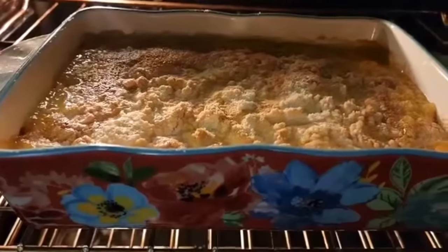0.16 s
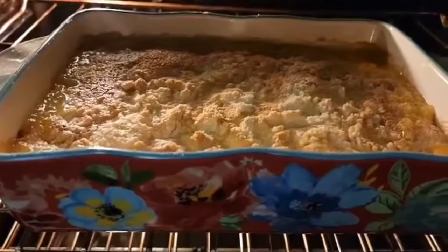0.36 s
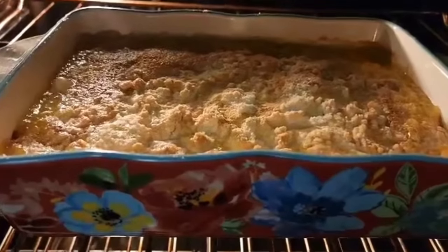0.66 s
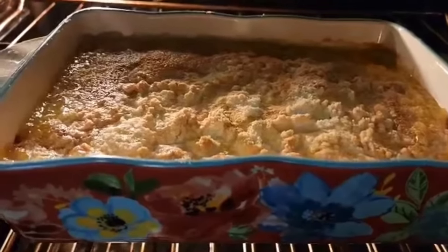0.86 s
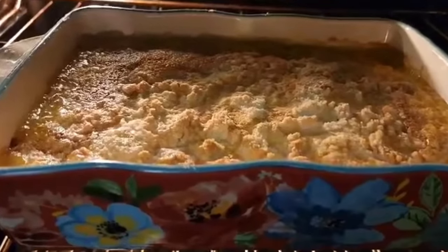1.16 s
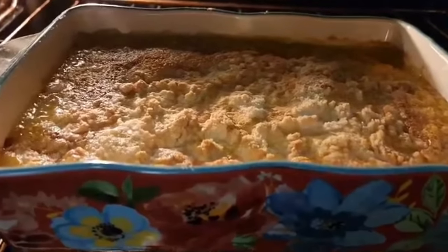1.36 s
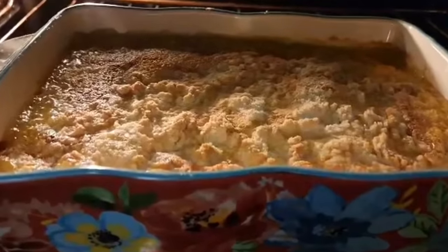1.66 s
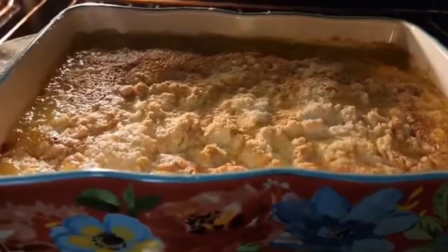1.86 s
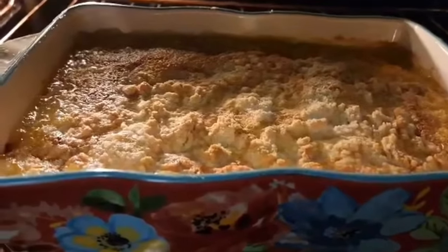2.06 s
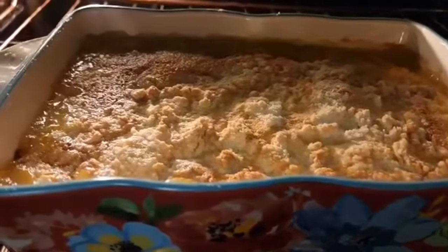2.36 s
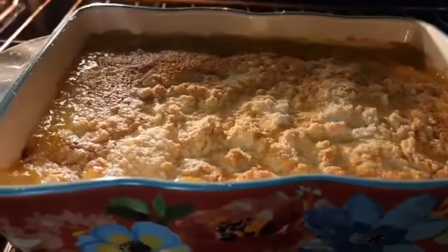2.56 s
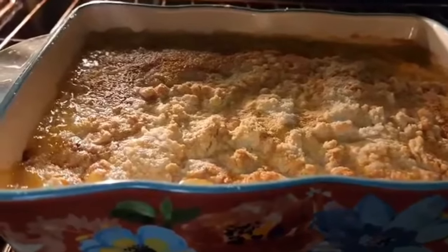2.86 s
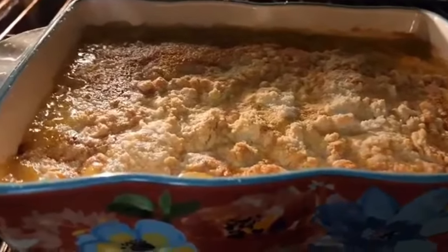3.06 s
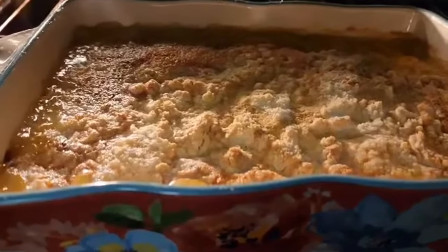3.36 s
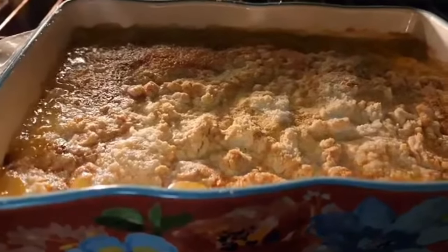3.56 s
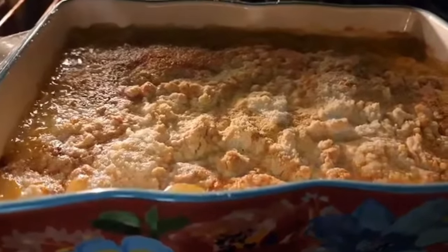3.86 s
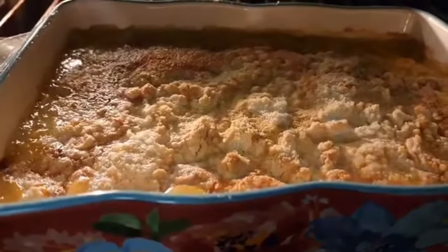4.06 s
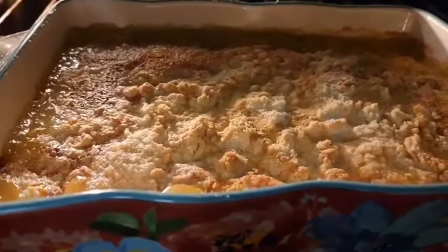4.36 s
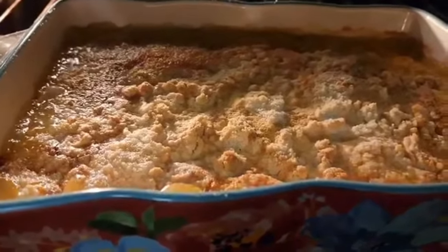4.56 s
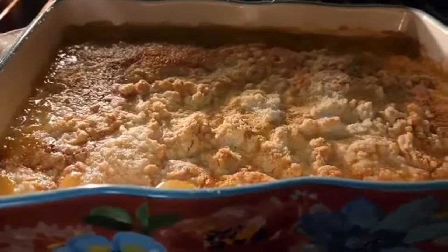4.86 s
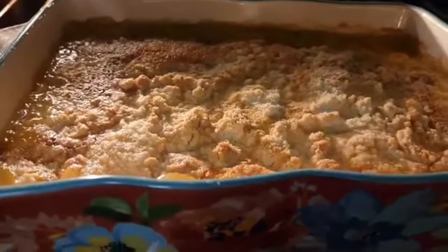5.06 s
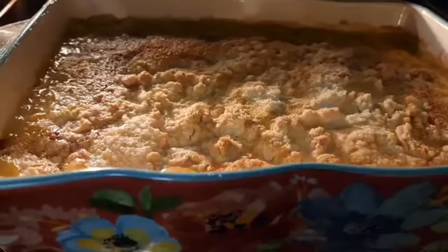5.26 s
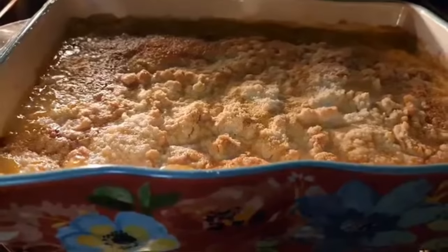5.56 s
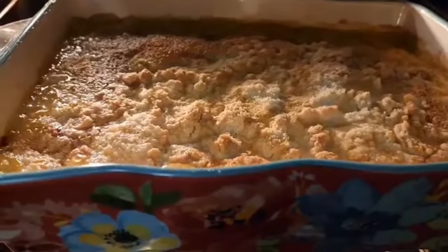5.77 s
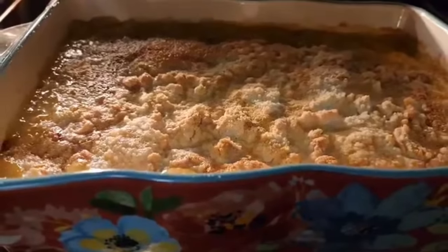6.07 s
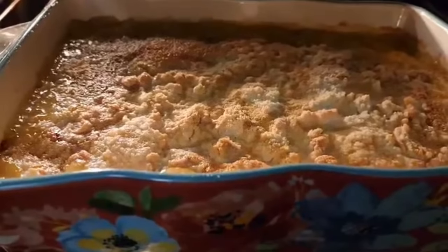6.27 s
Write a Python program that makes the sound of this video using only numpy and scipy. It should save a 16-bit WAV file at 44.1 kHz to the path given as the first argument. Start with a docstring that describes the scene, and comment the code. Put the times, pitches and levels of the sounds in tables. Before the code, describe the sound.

Close inside a hot oven, a steady low electrical hum and soft fluttering air lie beneath a baking fruit cobbler. Syrup fizzes continuously in a fine, uneven crackle, while small bubbles burst several times a second in short wet spits. Tiny pops, dull steam bumps and sharp crust ticks land irregularly, with a short metallic-walled echo. A very faint high whine sits on the right.

```python
"""An oven hums at twice the mains frequency over the soft noise of hot air, with a faint high whine on the right.
From the start, syrup on baking fruit fizzes: a shower of tiny random clicks. Bubbles soon burst in little sprays
of noise; steam bumps the crust, skins pop and the crust ticks in short rings; later, bubbles ring as they open.
The steel oven echoes the dish. All but the steady hum tone repeats about every three seconds, with its chance noise.
"""
import sys
import numpy as np
from scipy import signal
from scipy.fft import rfft, irfft
from scipy.io import wavfile

SR = 44100
rng = np.random.default_rng(int(sys.argv[2]) if len(sys.argv) > 2 else 0)


def unload_audio(sound):
    """Save the sound as a 16-bit wav file, at the path given as the first command line argument."""
    columns = np.transpose(np.atleast_2d(sound))
    # keep every value between -1 and 1, then stretch to whole-number steps
    steps = np.round(np.clip(columns, -1, 1) * 32767)
    wavfile.write(sys.argv[1], SR, steps.astype(np.int16))


N = 282394
CYCLE = 138318  # length of the repeating stretch [samples]
T = np.arange(CYCLE) / SR  # times in the cycle [s]
HZ = np.arange(CYCLE // 2 + 1) * SR / CYCLE  # frequencies in the cycle [Hz]
EAR_LAG_S = 0.0005  # how much later a pop reaches the right ear; ticks use half of it

# colour of the fine spray, in fizz and bursts: (frequency [Hz], relative level [dB])
SPRAY_COLOUR = [(7000, -12.5), (9000, 2.5), (10300, -19), (11600, 0.5), (13000, -14)]


def undb(db):
    """Turn decibels into gain."""
    return 10 ** (np.asarray(db) / 20)


def unit(x):
    """Scale to an average strength (rms) of 1."""
    return x / np.sqrt(np.mean(x ** 2))


def pan(db):
    """Left and right gains for a left-minus-right level in dB."""
    return undb(np.array([[db], [-db]]) / 2)


def curve(table):
    """Join (time, value) rows by straight lines."""
    return np.interp(T, *np.transpose(table))


def colour(points):
    """Gain at each frequency, from (Hz, dB) points joined on a log frequency scale."""
    hz, db = np.transpose(points)
    return undb(np.interp(np.log(np.maximum(HZ, 1)), np.log(hz), db))


def filtered(x, gain):
    """Weight the frequencies of a sound; its end wraps round to its start."""
    return irfft(rfft(x) * gain, CYCLE)


def walk(hz):
    """Smooth random wavering of spread 1, with up to about hz changes a second."""
    return unit(filtered(rng.standard_normal(CYCLE), np.exp(-(HZ / hz) ** 2)))


def crackle(rate, spread_db):
    """Tiny films break at random, about rate a second: many small, few large, with chance strengths in each ear."""
    happens = rng.random(CYCLE) < rate / SR
    size = undb(spread_db * np.minimum(rng.exponential(size=CYCLE), 4))
    return unit(happens * size * rng.standard_normal((2, CYCLE)))


def steel_box(x, t60, echo_db):
    """Add the dense echoes of the steel walls, as noise that fades by 60 dB in t60 seconds."""
    fade = np.exp(-np.log(1000) * T / t60)
    echoes = rng.standard_normal((2, CYCLE)) * fade * (T > 0.001)
    echoes /= np.sqrt(np.sum(echoes ** 2, axis=1, keepdims=True))
    return x + undb(echo_db) * filtered(x, rfft(echoes))


def shifting(x, count=48):
    """Let each narrow band swell and fade at random on its own, more deeply in the treble."""
    centres = np.linspace(0, 13000, count)
    depths_db = np.interp(centres, [2000, 3000], [2.8, 4.8])
    out = 0
    for weights, depth_db in zip(np.eye(count), depths_db):
        band = filtered(x, np.interp(HZ, centres, weights))
        out = out + band * undb(depth_db * walk(25))
    return out


def snap(hz, ring_s, lag_s):
    """A short damped ring that reaches the right ear lag_s later."""
    age = np.maximum(T[:256] - np.array([[0], [lag_s]]), 0)
    envelope = (age / ring_s * np.exp(1 - age / ring_s)) ** 2
    return envelope * np.sin(2 * np.pi * hz * age)


def add(out, s, sound):
    """Mix a short sound into the cycle at s seconds."""
    out[:, (int(s * SR) + np.arange(sound.shape[1])) % CYCLE] += sound


def hum(gain_db=1.83, octave_db=-28, hum_hz=119.92):
    """The oven body shakes at twice the mains frequency, with a faint octave; its level wavers slightly."""
    # level before gain_db: (time [s], level [dB])
    hum_levels = [(0, -43), (0.13, -41), (0.3, -43.5), (0.42, -43.5), (0.53, -42), (0.79, -41.5),
                  (0.9, -45), (1.0, -42), (1.28, -42), (1.66, -43), (1.87, -40.5), (2.08, -44),
                  (2.34, -40.5), (2.51, -44), (2.68, -41.5), (2.86, -43.5), (2.97, -42), (3.14, -42.5)]
    phase = 2 * np.pi * hum_hz * np.arange(N) / SR
    tone = np.sin(phase) + undb(octave_db) * np.sin(2 * phase)
    return np.sqrt(2) * tone * np.resize(undb(curve(hum_levels) + gain_db), N)


def air(flutter_db=1.68):
    """Churning hot air is noise shaped by the oven's resonances; the bass is nearly alike in both ears."""
    # noise before the resonances: (frequency [Hz], level [dB per Hz])
    air_colour = [(15, -84), (30, -75.5), (45, -73.5), (76, -70.5), (105, -72.5), (140, -74), (180, -85),
                  (290, -86.5), (350, -87), (450, -93), (725, -93), (790, -96), (1200, -107), (3000, -113),
                  (8000, -117), (13000, -130)]
    # the part that differs between the ears: (frequency [Hz], level against the shared part [dB])
    side_colour = [(25, -14), (60, -22), (140, -35), (220, -13), (450, -7), (650, -10), (850, -3),
                   (1200, 0)]
    # air resonances of the oven: (frequency [Hz], width [Hz], lift [dB])
    resonances = [(237, 93, 8.5), (301.4, 12.7, 8), (499.7, 41, 6.5), (540, 42, 3.5), (639, 78, 8),
                  (706, 31, 5.5)]
    lift_db = sum(db / (1 + (2 * (HZ - hz) / width) ** 2) for hz, width, db in resonances)
    noise = rng.standard_normal((2, CYCLE)) * np.sqrt(SR / 2)  # strength 1 per Hz
    mid, side = filtered(noise, colour(air_colour) * undb(lift_db))
    side = filtered(side, colour(side_colour))
    return (mid + side * np.array([[1], [-1]])) * undb(flutter_db * walk(18))


def whine(whine_hz=4738, whine_db=-85.5, pan_db=-7):
    """A thin sine tone, stronger on the right, wavers in pitch and level, half buried in the fizz."""
    phase = 2 * np.pi * np.cumsum(whine_hz + 7 * walk(15)) / SR
    waver_db = 3 * walk(10)
    return np.sqrt(2) * np.sin(phase) * undb(whine_db + waver_db) * pan(pan_db)


def fizz(gain_db=3.5, spray_pan_db=0, fine_db=-14, fine_slope=2):
    """Syrup simmers along the rim: many tiny films break in a dense crackle with a finer spray above it."""
    # how hard the syrup simmers, before gain_db: (time [s], level [dB])
    simmer_levels = [(0.0, -69.5), (0.13, -66), (0.3, -74), (0.51, -75), (0.6, -66.5), (0.79, -73),
                     (0.9, -68), (1.03, -69.5), (1.11, -74), (1.22, -70.5), (1.55, -67.5), (1.73, -70),
                     (1.85, -67.5), (2.04, -73), (2.12, -71), (2.5, -69.5), (2.68, -75), (2.85, -70),
                     (3.14, -68.5)]
    # colour of the coarse crackle: (frequency [Hz], relative level [dB])
    fizz_colour = [(500, -34), (1200, 4), (1800, 10.5), (2900, -0.5), (4500, -1), (6300, 4), (7600, 5),
                   (9000, -4.5), (10200, -53), (11600, -27), (13000, -15)]
    simmer_db = curve(simmer_levels) + gain_db
    # the spray is softer and swells more steeply (fine_slope dB per dB of simmer)
    mean_db = simmer_db.mean()
    spray_db = fine_db + mean_db + fine_slope * (simmer_db - mean_db)
    ruptures = steel_box(crackle(rate=650, spread_db=3.2), t60=0.06, echo_db=1)
    coarse = unit(filtered(ruptures, colour(fizz_colour))) * undb(simmer_db)
    fine = unit(filtered(crackle(rate=10000, spread_db=3.5), colour(SPRAY_COLOUR)))
    fine = fine * undb(spray_db) * pan(spray_pan_db)
    return shifting(coarse + fine)


def bursts(body_db=-1, spit_db=-1.5, spray_db=-18):
    """Bubbles tear open in quickly fading flurries of tiny breaks, each with its own strength and brightness."""
    # bursting bubbles: (time [s], level before the band mix [dB], brightness [dB])
    burst_list = [(0.045, -56.5, 6.5), (0.097, -53, -2), (0.21, -58, -1), (0.316, -55, -1.5),
                  (0.446, -68.5, -10), (0.55, -78, 1), (0.601, -60.5, 5), (0.679, -64, -5),
                  (0.714, -60.5, -1.5), (0.86, -73.5, -11.5), (0.951, -57, -3), (1.072, -67.5, 28.5),
                  (1.174, -56.5, -2), (1.36, -53, 3.5), (1.578, -58.5, -5), (1.667, -59, 6.5),
                  (1.774, -51, 2), (1.8113, -57, 14), (1.9914, -64, 30), (2.113, -57.5, -4),
                  (2.14, -70, -9), (2.242, -57.5, 8), (2.305, -69.5, -12), (2.177, -58.5, -2),
                  (2.45, -56.5, 4), (2.4746, -51.5, 6), (2.612, -71.5, 19), (2.72, -60.5, 19.5),
                  (2.7595, -68, -9.5), (2.922, -55, 4.5), (2.945, -58.5, -1), (3.057, -61, 12),
                  (3.107, -59, 6)]
    # low band of a burst: (frequency [Hz], relative level [dB])
    body_colour = [(400, -2), (800, 8), (1150, 1), (1850, 7), (3000, 3), (4200, -14.5), (7000, -53)]
    # middle band of a burst: (frequency [Hz], relative level [dB])
    spit_colour = [(1800, -48), (3600, 20), (5000, 19.5), (6400, 21), (7700, 16), (9000, -11), (10300, -28)]
    rise_s, typical_fade_s = 0.0012, 0.0084
    doubling_db = 60  # a bubble this much louder takes twice as long to empty
    spray_per_brightness = 0.82  # dB of spray per dB of brightness
    scatter_db = 0.5  # random left-right spread over the dish

    flurry = steel_box(crackle(rate=2500, spread_db=2.5), t60=0.012, echo_db=0)
    body = unit(filtered(flurry, colour(body_colour))) * undb(body_db)
    spit = unit(filtered(flurry, colour(spit_colour))) * undb(spit_db)
    spray = unit(filtered(flurry, colour(SPRAY_COLOUR))) * undb(spray_db)
    out = np.zeros((2, CYCLE))
    typical_db = np.mean([db for s, db, bright_db in burst_list])
    places = rng.standard_normal(len(burst_list))
    for (s, db, bright_db), place in zip(burst_list, places):
        start = int(s * SR)
        span = slice(start, start + SR // 5)
        age = T[span] - T[start]
        fade_s = typical_fade_s * 2 ** ((db - typical_db) / doubling_db)
        envelope = undb(db) * (1 - np.exp(-age / rise_s)) * np.exp(-age / fade_s)
        tear = undb(-bright_db) * body[:, span] + spit[:, span]
        tear += undb(spray_per_brightness * bright_db) * spray[:, span]
        out[:, span] += envelope * pan(scatter_db * place) * tear
    return steel_box(out, t60=0.19, echo_db=0.5)


def bump(rise_s=0.0046):
    """Large pockets of steam lift the crust, each with a dull bump of low noise, alike in both ears."""
    # steam pockets: (time [s], level [dB])
    bump_list = [(0.096, -50.5), (0.215, -56), (0.716, -54), (1.669, -45.5), (1.776, -58), (1.810, -55)]
    # colour of the bumps: (frequency [Hz], relative level [dB])
    bump_colour = [(180, -25), (300, 2), (370, 2), (470, -7), (640, -2), (850, -9), (1200, -30)]
    push = unit(filtered(rng.standard_normal(CYCLE), colour(bump_colour)))
    envelope = np.zeros(CYCLE)
    for s, db in bump_list:
        age = np.maximum(T - s, 0) / rise_s
        envelope += undb(db) * (age * np.exp(1 - age)) ** 2
    return push * envelope


def pops(gain_db=0, cycles=0.23, echo_db=2):
    """A taut bubble skin gives way in one quick swing of pressure, which rattles between the oven walls."""
    # popping skins, before echoes: (time [s], envelope peak [dB], pitch [Hz])
    pop_list = [(0.0966, -38, 2200), (0.1324, -50, 2000), (0.177, -47, 2400), (0.218, -42, 2200),
                (0.3207, -50, 2000), (0.7163, -42, 1700), (0.9572, -47, 3800), (1.1765, -46, 2000),
                (1.3635, -41, 4000), (1.5834, -42, 1900), (1.6697, -44, 1700), (1.7764, -39, 3400),
                (1.933, -48, 1900), (2.0765, -44, 1900), (2.475, -50, 3500), (2.613, -47, 1900)]
    out = np.zeros((2, CYCLE))
    for s, db, hz in pop_list:
        add(out, s, undb(db + gain_db) * snap(hz, cycles / hz, EAR_LAG_S))
    return steel_box(out, t60=0.06, echo_db=echo_db)


def ticks(gain_db=-5.0, ring_s=0.00026):
    """The crust snaps in sharp, very short rings; the walls leave a faint tail."""
    # crust ticks: (time [s], envelope peak before gain_db [dB], pitch [Hz], left minus right [dB])
    tick_list = [(0.1768, -36, 5940, -3), (0.609, -59.5, 7000, 18), (0.623, -51, 7200, 3),
                 (0.8644, -54.5, 7550, 2), (1.1662, -38, 5700, 1), (1.1762, -41.5, 7180, -2),
                 (1.1994, -43, 6100, -3), (1.248, -46.5, 6360, -14), (1.291, -51, 5040, -14),
                 (1.403, -39.5, 7340, -2), (1.6612, -39, 6700, 0), (1.812, -44, 5240, -20),
                 (2.122, -56, 4740, -5), (2.075, -32, 7100, -6), (2.0814, -32, 5800, -4),
                 (2.2317, -36.5, 6900, -6), (2.244, -38, 4900, -4), (2.9237, -45, 5000, -18),
                 (2.9289, -38, 7260, 7), (3.109, -51.5, 4500, -1)]
    out = np.zeros((2, CYCLE))
    for s, db, hz, pan_db in tick_list:
        add(out, s, undb(db) * pan(pan_db) * snap(hz, ring_s, EAR_LAG_S / 2))
    return undb(gain_db) * steel_box(out, t60=0.06, echo_db=-3)


def bubbles(fade_s=0.0078, rise_s=0.00036, width=0.18):
    """A tearing film shakes the air pocket under it, a narrow band of noise that thick syrup soon damps."""
    # larger bubbles that ring as they open: (time [s], pitch [Hz], level before envelope and echoes [dB])
    bubble_list = [(0.717, 1740, -60.5), (1.349, 3360, -56), (1.582, 1710, -64), (1.668, 1790, -63),
                   (1.931, 3270, -60), (2.177, 3950, -58), (2.477, 6370, -56), (2.613, 1870, -62),
                   (2.945, 4000, -64.5)]
    out = np.zeros((2, CYCLE))
    age = T[:4096]
    for s, hz, db in bubble_list:
        # small, high bubbles die away sooner; fade_s is for 1000 Hz
        fade = np.exp(-age / fade_s * (hz / 1000) ** (1 / 3))
        envelope = (1 - np.exp(-age / rise_s)) * fade
        tearing = rng.standard_normal((2, len(age)))
        # long waves reach both ears more alike
        tearing += tearing[::-1] / (1 + (hz / 1000) ** 2)
        edges = [hz / (1 + width / 2), hz * (1 + width / 2)]
        band = signal.butter(2, edges, "band", fs=SR, output="sos")
        start = int(s * SR)
        out[:, start:start + len(age)] += undb(db) * envelope * unit(signal.sosfilt(band, tearing))
    return steel_box(out, t60=0.12, echo_db=1)


def scene():
    """Repeat the cycle of air, whine and dish sounds over the running hum."""
    # the two channels differ in colour: (frequency [Hz], left minus right [dB])
    channel_colour = [(300, 0), (1000, .5), (2500, 1), (5000, 0), (6400, -2.5), (7700, -1.5), (9000, 5),
                      (10200, 7), (11500, -1.5), (13000, 0)]
    cycle = air() + whine() + fizz() + bursts() + bump() + pops() + ticks() + bubbles()
    left_right = np.sqrt(colour(channel_colour)) ** np.array([[1], [-1]])
    return filtered(cycle, left_right)[:, np.arange(N) % CYCLE] + hum()


def record(dry):
    """Cut the top steeply above 13000 Hz."""
    return signal.sosfilt(signal.ellip(10, 0.2, 80, 13000, fs=SR, output="sos"), dry)


dry = scene()
out = record(dry)
unload_audio(out)
```